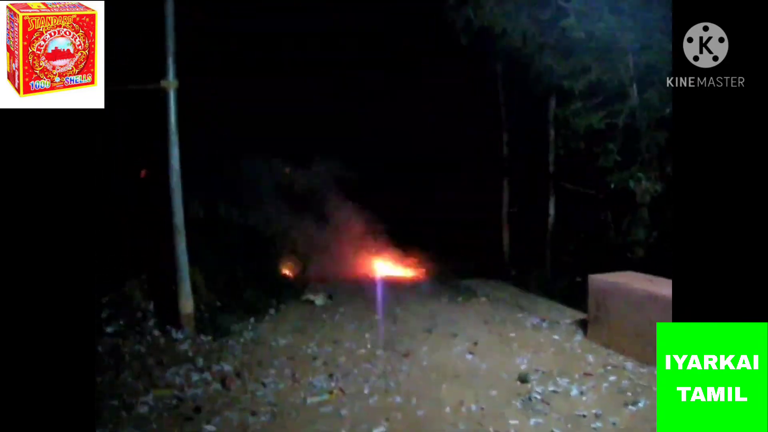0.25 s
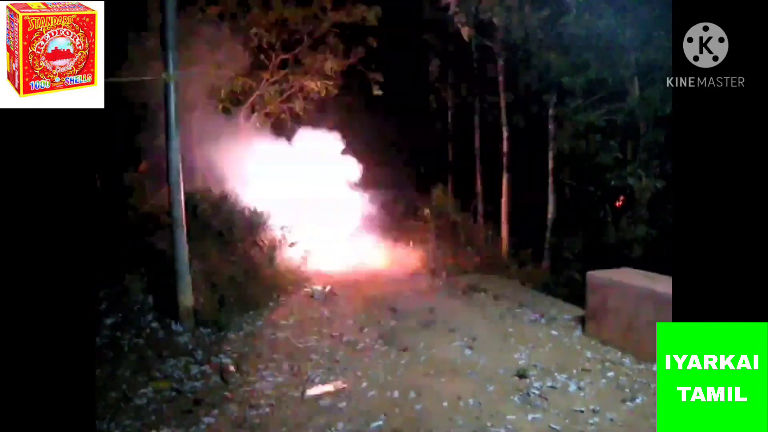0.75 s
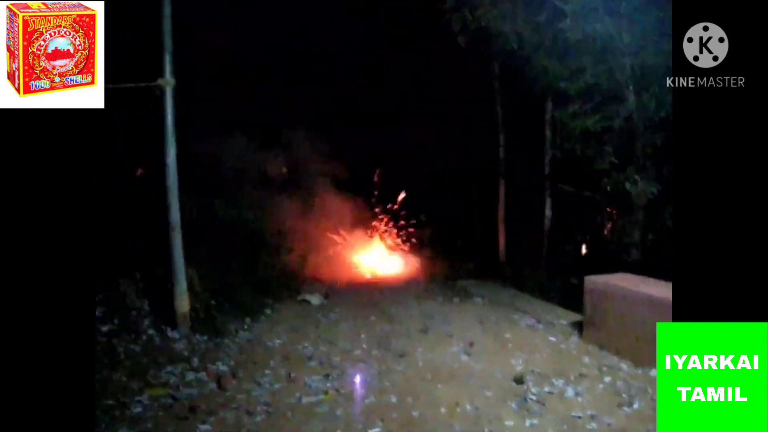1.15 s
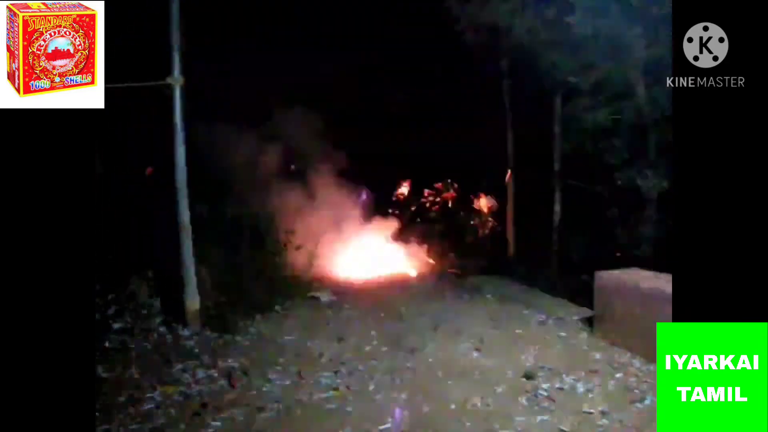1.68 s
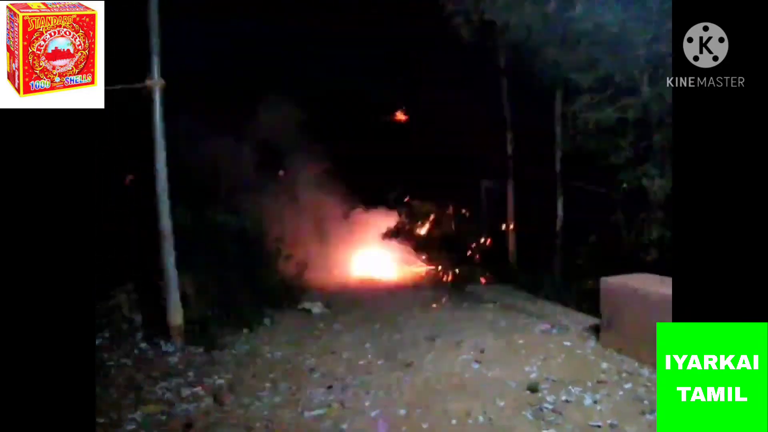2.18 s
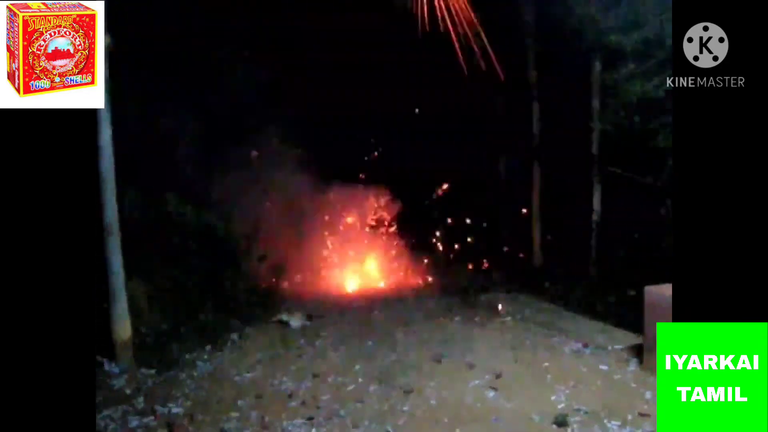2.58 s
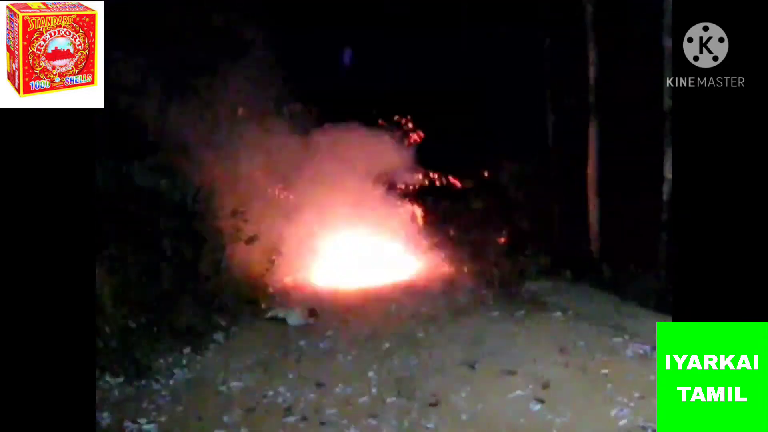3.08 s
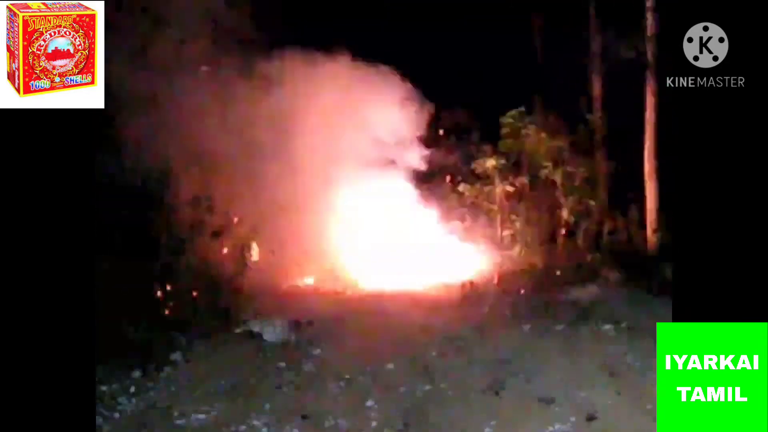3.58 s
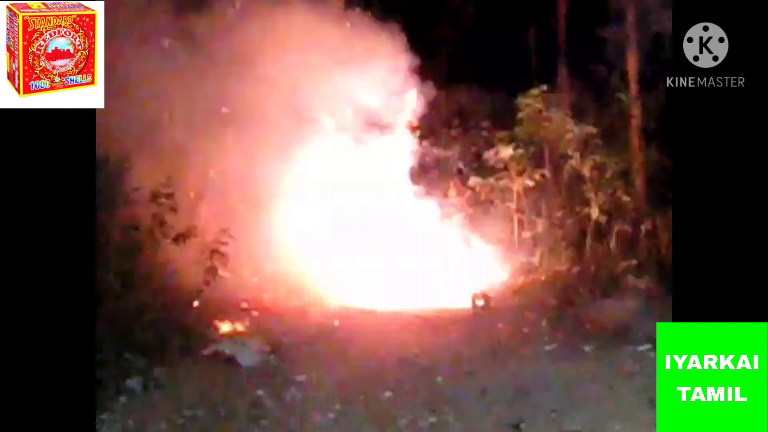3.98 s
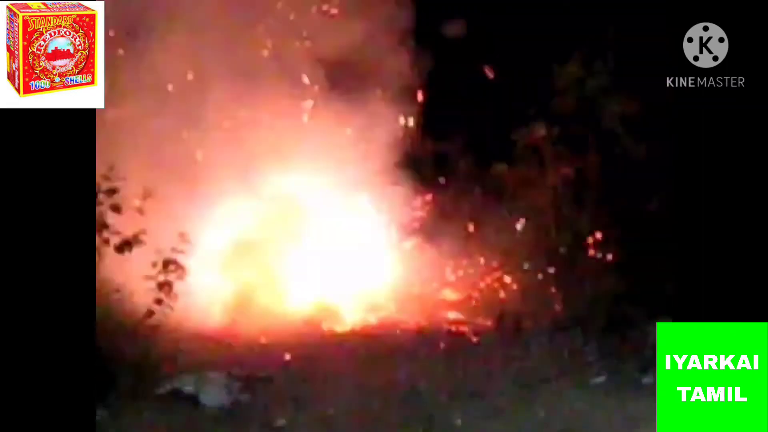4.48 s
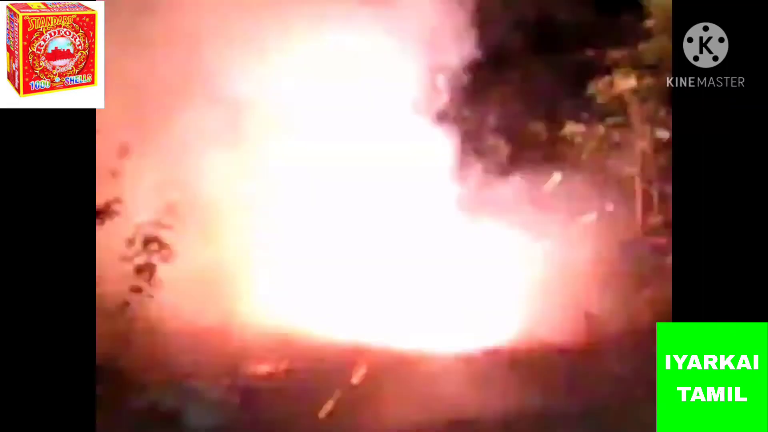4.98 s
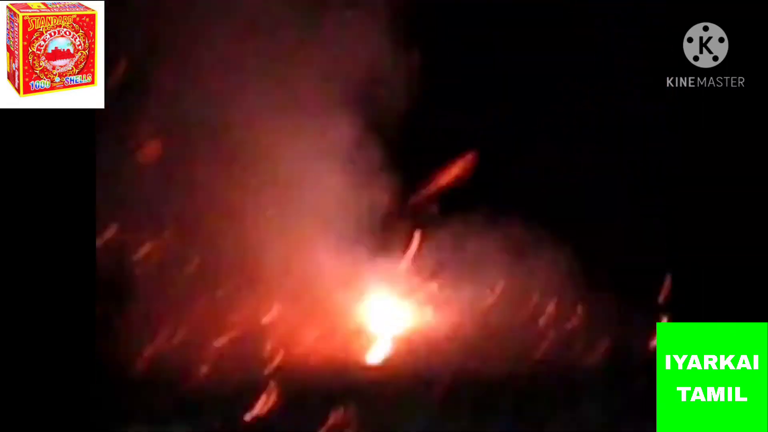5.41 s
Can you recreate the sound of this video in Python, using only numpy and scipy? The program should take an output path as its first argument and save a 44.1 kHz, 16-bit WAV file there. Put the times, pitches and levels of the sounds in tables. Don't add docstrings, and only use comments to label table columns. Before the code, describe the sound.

Nonstop firecrackers outdoors at night: hard, dry cracks of uneven strength, some single, others in tight clusters. The first second and a half is a little sparser, with a fuller roar of echoes; then the chain gets denser and the bangs take on a short hollow ring from the kerb. Clipped, bass-thin microphone sound, with the background ducking after loud bangs, left channel only.

```python
import sys
import numpy as np
from scipy import signal
from scipy.fft import rfft, irfft
from scipy.io import wavfile
from scipy.ndimage import uniform_filter1d

SR = 44100
rng = np.random.default_rng(int(sys.argv[2]) if len(sys.argv) > 2 else 0)


def pcm_store(signal):
    levels = np.round(np.clip(np.atleast_2d(signal), -1, 1) * 32767)
    wavfile.write(sys.argv[1], SR, levels.astype(np.int16).T)


N = 249165

FIRE_MOVES_S = 1.5
TREBLE_MEAN_DB = -10


def amp(db):
    return 10 ** (np.asarray(db) / 20)


def unit(x):
    return x / np.sqrt(np.mean(x ** 2))


def coloured(x, spectrum, lo_hz=1., hi_hz=30400.0):
    hz = np.maximum(np.fft.rfftfreq(len(x), 1 / SR), 1)
    points = np.array(spectrum)
    gain = amp(np.interp(np.log(hz), np.log(points[:, 0]), points[:, 1]))
    gain = gain / np.sqrt((1 + (lo_hz / hz) ** 4) * (1 + (hz / hi_hz) ** 4))
    return irfft(rfft(x) * gain, len(x))


def low_pass(edge_hz):
    return signal.butter(2, edge_hz, fs=SR, output="sos")


def flicker(rate_hz, depth_db):
    hold = int(SR / rate_hz)
    steps = np.repeat(rng.standard_normal(N // hold + 1), hold)
    smooth = uniform_filter1d(steps, hold)[:N]
    return amp(depth_db * unit(smooth))


def fading(since_s, t60_s):
    return (since_s > 0) * np.exp(-np.log(1000) * np.maximum(since_s, 0) / t60_s)


def blast(ms, length_ms):
    rise = np.clip((ms + .04) / .1, 0, 1)
    push = rise * np.cos(np.pi / 2 * np.clip((ms - .05) / .15, 0, 1))
    pull = .83 * np.sin(np.pi * np.clip((ms - .2) / (length_ms - .2), 0, 1) ** .9)
    return push - pull


def snap(ms, noise):
    treble = coloured(noise, [(1800, -64), (3200, 10.0), (6000, -5.5), (10000, -9.5), (15000, -8)])
    burst = np.exp(-((ms - .35) / .45) ** 2) * treble
    return burst / np.abs(burst).max()


def rubble(ring_hz, noise, ground):
    hump = [(.3, -1), (.78, -18.5), (1, 3), (1.27, -9.5), (4, -16.5)]  # (times ring_hz, dB)
    around_ring = [(ring_hz * k, db) for k, db in hump]
    return unit(coloured(coloured(noise, ground), around_ring))


def crackers():
    # start_s, wave_length_ms, snap_db, peak_db (before overload), near_echo_db
    string_bangs = [(.0012, 0.66, -20, 11, -5.5), (.0249, .95, -23, 1, -19), (.1687, 1.14, -2.5, 7, -13.5),
                    (.2801, 0.46, -4, 3, 4.5), (.3454, 0.76, -10, 6, -9.5), (.3859, .57, -14, 6, -7.5),
                    (.4021, .95, -14, -7.5, -18), (.4627, 0.69, -12, 6.5, -9.5), (.5859, 0.7, -7.5, 3, -5.5),
                    (.6064, 0.67, -9, 4, -12.5), (.6338, 0.95, -26, 1, -26), (.706, 0.77, -5.5, 7, -11),
                    (.7721, 0.87, -5.5, 5, -5), (.8275, 0.74, -9, 12, -10), (.8541, 0.58, -10, 4, -8.5),
                    (.9697, 0.62, -20, -12, -21), (.9831, .86, -13, 1.5, -9.5), (1.1037, 0.7, -12, 0, -3),
                    (1.1185, 0.67, -10, -1, -13), (1.1499, 0.72, -9, -3, -8), (1.2579, 0.6, -7.5, -1, -1.5),
                    (1.306, 0.64, -11, 7, -8), (1.3908, 0.68, -11, 7, -8), (1.4047, 0.67, -10, 6, -10.5),
                    (1.6062, 0.69, -3.5, 7, 1), (1.623, 1, -19, -14, -20), (1.6372, 0.71, -14, 4.5, -3),
                    (1.663, 0.75, -13, 1, -8), (1.6722, 0.64, -10, 0, -10.5), (1.7276, 0.73, -4, 1, -6.5),
                    (1.7803, 0.87, -20, -2.5, -13), (1.7929, 0.7, -14, 0.5, -14),
                    (1.8959, 0.65, -14, 9, -4.5), (2.013, 0.64, -22, -11, -18),
                    (2.0279, 0.82, -0.5, 2, -2.5), (2.0645, 0.59, -11, 3, -9.5),
                    (2.1282, .79, -17, 10.5, -4.5), (2.1518, .75, -18, 0, -8.5), (2.234, 0.9, -11.5, 5, 0),
                    (2.2932, 0.65, -10, 7, -9), (2.3348, 0.71, -23, 4, -14.5),
                    (2.3959, 0.8, -27, -6.5, -13.5), (2.4108, 0.83, -29, -14, -25),
                    (2.4285, 0.67, -9, 3, -4.5), (2.475, 0.55, -14, -3, -9), (2.4928, .7, -17, -3, -15),
                    (2.5138, 0.67, -12.5, -3, -19), (2.5692, 0.64, -20, 1.5, -11),
                    (2.637, .7, -9, 1, -13), (2.6567, 0.63, -17, 2.5, -12), (2.7377, 0.6, -20, 3, -10.5),
                   (2.7902, 1.1, -23, -7.5, -15), (2.8573, 0.57, -6, 15, -3), (2.8674, 0.53, -12, 11, -7),
                   (2.8964, 0.79, -13, -4.5, -12.5), (2.9536, 0.69, -17.5, 0.5, -14.5),
                   (2.9963, 0.72, -14, -2, -19.5), (3.0024, 0.7, -15, 0.5, -21),
                   (3.0217, 0.66, -13, -1, -11.5), (3.12, 0.62, -8.5, 9, -6), (3.1353, 1.3, -11, -2.5, -27),
                   (3.1859, 0.72, -17, 9, -2), (3.2098, .7, -23, -12, -14),
                   (3.2364, 0.62, -15, -1.5, -15.5), (3.3275, 0.54, -12.5, -7, -26),
                   (3.3703, 0.59, -2.5, 10, -4), (3.378, 0.39, -4, 5, -1.5), (3.3987, 0.56, -17, -11, -4.5),
                   (3.405, .63, -16, -1, -11.5), (3.5316, 0.62, -16, 14.5, -5.5),
                   (3.5403, 0.8, -21, 7, -11.5), (3.6032, 1.18, -13, -2.5, -14),
                    (3.6343, 0.72, -13, 12, -7.5), (3.6923, 0.86, -19, 2.5, -11.5),
                    (3.7261, 0.7, -12.5, 7, -8), (3.7542, 0.43, -13, 0.5, -13.5),
                    (3.7673, 0.56, -16, -3, -14), (3.8025, 0.89, -17, -6, -17.5),
                    (3.8408, 0.95, -11.5, -1, -15), (3.881, 0.73, -15, 6, -5.5),
                    (3.8982, 1.02, -23, -0.5, -18), (3.9583, 0.61, -9, 10, -9), (3.9828, 0.67, -11, 0, -5),
                    (3.9942, 0.76, -28, -11, -17), (4.0688, 0.59, -12, 9, -9),
                    (4.0786, 0.67, -16, -1.5, -20), (4.099, 1.06, -13, -3, -13),
                    (4.1124, 1.06, -29, -3, -13.5), (4.121, 0.68, -7, 5, -22), (4.134, 0.48, -8, 3, -11),
                    (4.1495, 0.71, -10, -2, -9.5), (4.197, 0.54, -8, 2, -8),
                    (4.299, 0.82, -17, -2.5, -15.5), (4.3354, 0.65, -14, -7, -16),
                    (4.3534, 0.66, -11, 15, -2), (4.3689, 0.72, -14, 2, -9.5), (4.4168, 0.56, -8, -1, -2.5),
                   (4.4234, 0.56, -25, -5, -21), (4.4351, 1.1, -23, -9, -25),
                   (4.4629, 0.85, -15, -3.5, -12), (4.4987, 1.11, -15, -3.5, -12),
                   (4.5066, 0.57, -11, 2, -15), (4.5588, .73, -13, 0.5, -16.5),
                   (4.6165, 0.86, -11, -4, -14), (4.6608, 0.52, -15, -10, -21),
                   (4.6647, 1.1, -15.5, -6, -18), (4.711, 0.89, -7.5, 6.5, -4), (4.7446, 0.57, -9, -1, -8),
                   (4.7651, 0.7, -21, -1, -12.5), (4.8047, 0.84, -15, 1, -36), (4.8079, 0.71, -8, -2, -11),
                   (4.8393, 0.37, -24, -14, -24), (4.8833, .75, -19, -4, -15.5),
                   (4.9209, .88, -11, 4.5, -26), (4.9258, 0.59, -15, 4, -8), (4.9512, 0.97, -14, -0.5, -30),
                    (4.9769, 0.67, -7.5, 1, -10), (5.0498, 0.93, -4, -0.5, -8), (5.0641, 0.74, -7.5, 1, -7),
                   (5.0773, .7, -10, -3, -16), (5.1443, 1.1, -9, -5, -21), (5.1479, 0.7, -6, -2, -10.5),
                   (5.1723, 0.6, -6, 1, -6.5), (5.1909, 0.6, -12, 6, -12), (5.2061, 0.51, -18, 0, -16),
                   (5.2238, 0.72, -11, -1.5, -17), (5.2394, 0.69, -14.5, 0.5, -19),
                   (5.2908, 0.72, -15, -1.5, -15), (5.2982, .86, -14.5, 0, -10.5),
                   (5.348, 0.68, -16.5, -8.5, -21.5), (5.3777, 0.84, -10.5, -2.5, -35),
                   (5.423, 0.49, -14, -8.5, -19), (5.457, 0.85, -15, 1, -20), (5.4843, .75, -8, 4, -13),
                   (5.5488, 0.68, -7, 10, -9), (5.5574, 0.69, -17, 5, -12), (5.5824, 1.3, -28, -2.5, -20),
                   (5.6032, 0.77, -19, -2, -23), (5.629, 0.72, -9, 9, -8)]
    bang_list = string_bangs
    # pitch_hz of the scatter ring, lopsided overload (-1 to 1)
    cracker_rings = [(1460, 0.14), (670, -0.077), (634, -0.061), (900, -0.19), (1300, 0.048), (1290, 0.032),
                     (2790, -0.028), (1260, 0.012), (1260, 0.094), (2070, 0.031), (2080, -0.088),
                     (2000, 0.021), (1170, 0.037), (2790, 0.03), (1260, -0.08), (1700, -0.003), (590, -0.055),
                     (1970, 0.1), (1930, -0.037), (1940, -0.086), (2060, 0.077), (1730, 0.021),
                     (2370, -0.015), (694, 0.022), (1820, 0.369), (590, -0.064), (690, 0.047), (2870, 0.031),
                     (2830, 0.025), (1720, -0.074), (740, 0.02), (1900, -0.021), (577, 0.093),
                     (1820, -0.0082), (1390, 0.039), (2570, -0.084), (654, -0.04), (643, -0.023),
                     (1470, -0.055), (1880, -0.047), (675, -0.03), (640, -0.0007), (610, -0.002),
                     (1230, -0.077), (580, -0.019), (580, -0.017), (1100, -0.021), (620, -0.017),
                     (630, -0.064), (623, -0.05), (606, 0.005), (1830, -0.042), (1940, 0.052), (1030, 0.032),
                    (1810, -0.033), (590, -0.0094), (620, 0.0099), (1860, -0.037), (607, -0.013),
                    (1070, 0.033), (576, -0.022), (1790, 0.11), (3030, -0.011), (590, -0.01), (1950, -0.03),
                    (970, 0.066), (1660, 0.033), (566, 0.043), (1690, -0.087), (1080, 0.02), (570, -0.014),
                    (560, -0.024), (1040, -0.012), (533, -0.024), (670, 0.011), (2500, -0.046), (1110, 0.0),
                    (570, -0.014), (560, -0.034), (574, 0.031), (570, -0.023), (2390, -0.055), (530, 0.04),
                    (577, -0.0096), (2530, -0.066), (600, -0.002), (550, -0.029), (600, -0.027),
                    (600, -0.064), (2920, -0.067), (810, 0.006), (570, -0.045), (564, -0.007), (583, -0.03),
                     (990, -0.11), (2980, 0.019), (1050, 0.08), (1970, 0.035), (610, -0.012), (580, -0.023),
                  (590, -0.032), (820, -0.027), (1780, -0.0077), (1050, -0.033), (510, 0.0072),
                  (570, -0.011), (1620, -0.11), (544, -0.06), (593, -0.084), (960, -0.056), (2000, 0.052),
                  (1960, -0.001), (550, -0.021), (2580, -0.048), (570, -0.031), (500, -0.03), (640, 0.046),
                  (560, -0.0067), (596, 0.021), (2800, -0.053), (1090, 0.0018), (990, 0.028), (1140, 0.024),
                  (1780, 0.023), (1120, -0.033), (1770, -0.003), (3020, -0.03), (593, -0.034),
                  (580, -0.021), (1710, -0.005), (1810, -0.064), (1120, -0.007), (1880, -0.045),
                  (1810, -0.103), (2730, -0.014), (1830, -0.088), (544, -0.0088), (1770, -0.016),
                  (1880, 0.11)]
    ring_list = cracker_rings
    # start_s, snap_db
    duds = [
        (2.6686, -13.0),
        (2.8525, -4.0),
    ]
    # delay_ms, strength (negative = flipped)
    later_echoes = [(1.85, .24), (2.08, .18), (2.62, -.33), (3.05, -.1), (3.39, .06), (3.86, .15),
                    (4.19, -.09), (4.51, -.05)]
    # delay_ms, strength
    first_echoes = [(1.0, .15), (1.45, .15), (1.8, .3), (2.2, .15), (2.45, .25), (3.35, .33), (3.9, .27),
                    (4.35, .12)]
    # pitch_hz, level_db (per Hz)
    later_ground = [(50, 8), (300, -6), (580, 3.5), (730, -5), (950, 0.5), (1800, -5.5), (2900, -4),
                    (5000, -4), (15000, -6.5)]
    # pitch_hz, level_db (per Hz)
    first_ground = [(300, -7.5), (550, -0.5), (800, 2), (1250, -1.5), (2000, -1), (5000, -8)]

    echo_db, scatter_db, ring_db, snap_boost_db = 13, 2, -5, 4.5
    scatter_s, linger_s, linger_db = 0.003, 0.0076, -13
    echo_edge_hz, snap_db_per_octave = 5340, 10
    thud_ms, thud_db = 1.18, 11.5
    hum_hz, hum_t60_s, hum_db, hum_lag_s = 595.4, 0.031, -17.5, 0.001976
    overtone_hz, overtone_db = 1735, -6.5
    trunks_t60_s, trunks_db = 0.14, -24

    span, short = 4096, 1024
    bangs, snaps, thuds, trunks = np.zeros((4, N + span))
    chance = rng.standard_normal((len(bang_list), 2 * len(later_echoes) + span + 1))
    for bang, (ring_hz, lopsided), luck in zip(bang_list, ring_list, chance):
        s, length_ms, snap_db, peak_db, near_db = bang
        at_start = s < FIRE_MOVES_S
        echoes = first_echoes if at_start else later_echoes
        ground = first_ground if at_start else later_ground
        start, length_ms = int(s * SR), min(length_ms, .97)
        tail_s = (start + np.arange(span)) / SR - s
        ms = 1000 * tail_s[:short]

        after = np.maximum(ms - length_ms, 0)
        rebound = 0.4 * np.sin(np.pi * after / .4) ** 2 * np.exp(-after / 0.64)
        wave = amp(peak_db) * (blast(ms, length_ms) + rebound)

        near = np.zeros(short)
        for (lag_ms, share), shift, size in zip(echoes, luck[span::2], luck[span + 1::2]):
            echo = blast(ms - lag_ms - 0.072 * shift, 0.73)
            near += amp(near_db + echo_db + 2.2 * size) * share * echo

        burst = np.exp(-(ms / 1000 / scatter_s) ** 3)
        linger = amp(linger_db) * np.exp(-ms / 1000 / linger_s)
        hold = np.clip((ms - .5) / 0.058, 0, 1) * (burst + linger)
        ring_s = (ms - length_ms) / 1000
        near += amp(near_db + scatter_db) * hold * rubble(ring_hz, luck[:short], ground)
        near += amp(near_db + ring_db) * hold * np.sin(2 * np.pi * ring_hz * ring_s)

        edge_hz = echo_edge_hz * 2 ** ((snap_db - TREBLE_MEAN_DB) / snap_db_per_octave)
        wave += coloured(near, [(100, 0), (10000, 0.005)], hi_hz=edge_hz)

        if s > FIRE_MOVES_S:
            since = ms / 1000 - hum_lag_s
            hum = fading(since, hum_t60_s) * np.sin(2 * np.pi * hum_hz * since)
            wave += amp(min(peak_db, 3.0) + hum_db) * hum
            wave += amp(near_db + overtone_db) * hold * np.sin(2 * np.pi * overtone_hz * ring_s)

        bangs[start:start + short] += wave
        snaps[start:start + short] += amp(snap_db + snap_boost_db) * snap(ms, luck[short:2 * short])
        thud = np.sin(np.pi * np.clip(ms / thud_ms, 0, 1)) ** 2
        thuds[start:start + short] += amp(thud_db) * lopsided * thud
        reined_db = min(peak_db, 2.5) + trunks_db
        trunks[start:start + span] += (amp(reined_db) * fading(tail_s - .002, trunks_t60_s)) ** 2

    for s, snap_db in duds:
        start = int(s * SR)
        pop = snap(1000 * np.arange(short) / SR, rng.standard_normal(short))
        snaps[start:start + short] += 1.5 * amp(snap_db) * pop
    return bangs[:N], snaps[:N], thuds[:N], trunks[:N]


def cracks():
    # start_s, pitch_hz, peak_db
    crack_list = [(0.0013, 3000, -11), (0.1684, 4340, 2.5), (0.386, 5260, -11), (0.4022, 5500, -8),
                  (0.4632, 6800, -6), (0.586, 2900, 1), (0.6065, 4500, -4), (0.7062, 4300, -11),
                  (0.8273, 3100, -3), (0.8545, 2900, -9), (1.1062, 2880, 7), (1.26, 3070, -12),
                  (1.6374, 2900, -3.5), (1.6629, 2900, -8), (1.672, 3200, -8), (1.7927, 2900, -6),
                  (1.8956, 3700, -4), (2.0647, 3000, -5), (2.2935, 2800, -12), (2.4745, 4750, -6.5),
                  (2.4922, 3100, -6), (2.5139, 5100, -13.5), (2.638, 2900, -6), (2.6568, 3200, -9),
                  (2.868, 3800, -8), (2.8967, 3700, -12), (3.003, 5460, -12), (3.0218, 3100, -16),
                  (3.1854, 3400, -10), (3.2112, 3000, -10), (3.328, 4450, -15), (3.4056, 2900, -8),
                  (3.532, 2960, -2), (3.7543, 3000, -6), (4.0684, 2800, -5), (4.0992, 3600, -11),
                  (4.1353, 2800, -12), (4.4626, 3180, -8.5), (4.5068, 3400, -5), (4.5582, 2870, -9),
                  (4.6166, 5430, -11), (4.7457, 3000, -10), (4.7652, 3220, -5), (4.808, 3800, -9),
                  (4.8835, 3200, -6.5), (4.9259, 4800, -9), (4.9514, 4700, -4), (5.077, 3100, -17),
                  (5.1482, 4000, -11), (5.1725, 3800, 0), (5.191, 4100, -4), (5.2067, 4000, -5),
                  (5.2395, 4500, -8), (5.2907, 3820, -14), (5.3781, 3330, -6), (5.423, 3320, -9),
                  (5.4842, 2900, -6), (5.5576, 4200, -1.5), (5.6033, 3100, -8), (5.6284, 2900, -14)]
    crack_db, crack_cycles = -0.6, 1
    out = np.zeros(N + 64)
    samples = np.arange(-32, 32)
    around_s = samples / SR
    for (s, hz, db), turn in zip(crack_list, rng.random(len(crack_list))):
        bell = np.exp(-(around_s * hz / crack_cycles) ** 2)
        tone = np.cos(2 * np.pi * (hz * around_s + turn))
        out[int(s * SR) + samples] += amp(db + crack_db) * bell * tone
    return out[:N]


def ducking():
    # start_s, depth_db
    clamps = [(0, 9), (0.162, 9.5), (0.286, 9.5), (0.369, 7.5), (0.591, 5.5), (0.825, 11.5), (1.101, 10.5),
              (1.16, 3), (1.261, 14.5), (1.382, 16.5), (1.62, 11), (1.799, 8.5), (2.16, 4), (2.32, 6),
              (2.51, 6.5), (2.59, 5), (2.86, 8.5), (2.91, 7), (3.03, 6), (3.216, 13.5), (3.419, 8.5),
              (3.56, 6), (3.72, 7), (3.98, 5.5), (4.2, 3.5), (4.42, 8), (4.56, 7), (5.1, 0.5), (5.318, 4),
              (5.58, 8)]
    attack_s, release_s = 0.032, 0.1
    s, depth_db = np.transpose(clamps)
    since = np.maximum(np.arange(N)[:, None] / SR - s, 0)
    dip = np.exp(-since / release_s) - np.exp(-since / attack_s)
    return amp(-dip @ depth_db / np.abs(dip).max())


def woods(trunk_power):
    # start_s, level_db, treble_db (against the level)
    wash_levels = [(0, -14, -4.5), (.35, -5.5, -7), (.7, -16, -6), (1.05, -13.5, -5), (1.41, -2.5, -6),
                   (1.76, -16.5, -4), (2.12, -20, -5), (2.47, -23, -3.5), (2.82, -15.5, -5.5),
                   (3.18, -17.5, -4.5), (3.53, -15, -6), (3.88, -20, -4), (4.24, -21, -5.5),
                   (4.6, -19, -3.5), (4.94, -25.5, -3.5), (5.3, -26.5, -2.5), (5.65, -14, -5.5)]
    # pitch_hz, level_db (per Hz)
    wash_colour = [(50, -12), (200, -15), (450, -11.5), (700, -7), (950, 0.5), (1400, -2), (2400, -2.5),
                   (4000, -7.5), (6000, -11.5), (15000, -23)]
    # start_s, level_db
    swell_levels = [(0, -1.5), (.5, -7.5), (1.0, -7), (1.55, -4), (2.1, -4), (3.0, -6), (4.2, -4),
                    (5.65, -6.5)]
    swell_hz, swell_width_hz = 1249, 590
    fresh_s, fresh_power, fresh_treble = 0.018, 0.19, 0.11

    s, level_db, treble_db = np.transpose(wash_levels)
    now = np.arange(N) / SR
    level = amp(np.interp(now, s, level_db))
    treble = amp(np.interp(now, s, treble_db - TREBLE_MEAN_DB))
    gain = ducking()
    treble = treble * gain ** -fresh_treble
    keep = np.exp(-1 / (fresh_s * SR))
    recent = signal.lfilter([1 - keep], [1, -keep], trunk_power) / trunk_power.mean()
    treble = treble * (recent + 0.082) ** fresh_power

    grains = rng.standard_normal(N) * flicker(400, 0.81) * flicker(89, 0.57)
    grains = grains * flicker(35, 1.3)
    scale = np.sqrt(np.mean(coloured(grains, wash_colour) ** 2))
    wash_power = 0.32 * (level * gain) ** 2
    body_gain = np.sqrt(wash_power + trunk_power)
    bright_gain = np.sqrt(0.4 * wash_power * treble ** 0.79 + 0.062 * trunk_power)
    top_gain = np.sqrt(0.21 * wash_power * treble ** 3.34 + .5 * trunk_power)
    out = body_gain * coloured(grains, wash_colour, hi_hz=4070.0)
    out += bright_gain * coloured(grains, wash_colour, lo_hz=5200.0, hi_hz=7160.0)
    out += top_gain * coloured(grains, wash_colour, lo_hz=10400.0)

    turn = 2 * np.pi * np.cumsum(swell_hz * flicker(12, 0.8)) / SR
    slow = signal.sosfilt(low_pass(swell_width_hz), rng.standard_normal((2, N)))
    swell = unit(slow[0] * np.cos(turn) + slow[1] * np.sin(turn)) * flicker(150, 1.1)
    swell_gain = amp(np.interp(now, *np.transpose(swell_levels)))
    return out / scale + np.sqrt(wash_power) * swell_gain * swell


def scene():
    # pitch_hz, level_db
    later_lane = [(250, -2.5), (450, -1.5), (600, 0.5), (730, -4.5), (900, -0.64), (1300, -3.2), (2200, -1),
                  (3500, -3.36)]
    # pitch_hz, level_db
    first_lane = [(250, 0.5), (500, -1), (800, -0.5), (1300, -1.1), (3000, -0.7)]
    rumble_db = -13.5
    bangs, snaps, thuds, trunk_power = crackers()
    wash = woods(trunk_power)
    early = np.arange(N) < FIRE_MOVES_S * SR
    lane_bangs = np.where(early, coloured(bangs, first_lane), coloured(bangs, later_lane))
    air = lane_bangs + wash + 0.95 * cracks()
    top = .93
    flat = air / (1 + np.abs(air / top) ** 5) ** (1 / 5) + snaps
    thin = flat - 0.34 * signal.sosfiltfilt(low_pass(260), flat)
    excess = thin - thuds - amp(rumble_db) * wash
    deep = signal.sosfiltfilt(low_pass(190), excess)
    return np.array([thin - deep, np.zeros(N)])


def record(dry):
    top_cut = [(15400, 0), (15700, -18), (16500, -22), (16700, -50)]  # (pitch_hz, level_db)
    heard = dry[0]
    for wall in (.98, .97):
        heard = coloured(np.clip(1.03 * heard, -wall, wall), top_cut)
    return np.array([np.clip(heard, -1, 1), dry[1]])


dry = scene()
out = record(dry)
pcm_store(out)
```